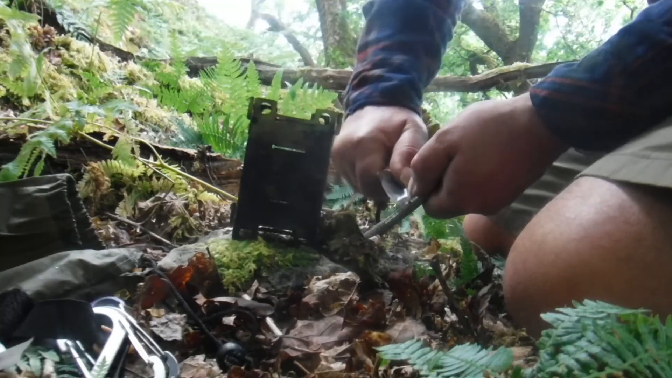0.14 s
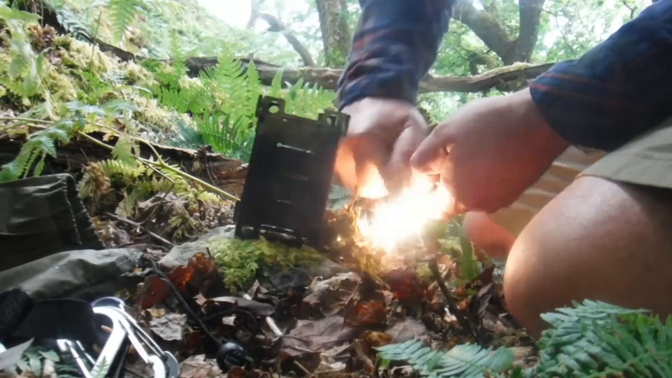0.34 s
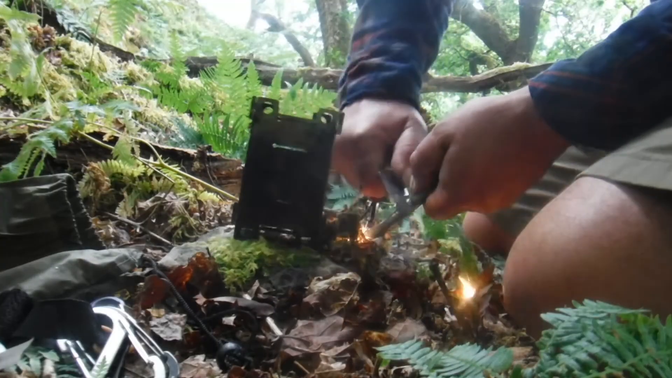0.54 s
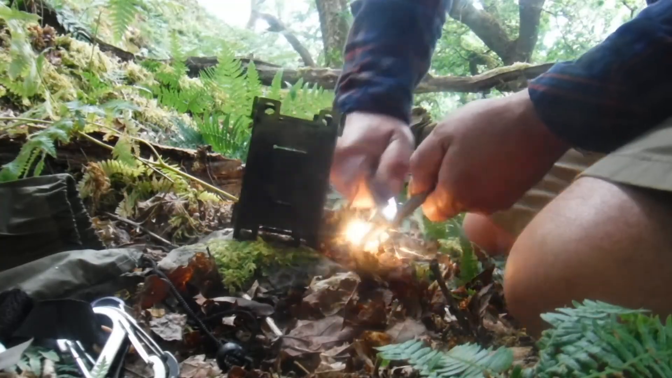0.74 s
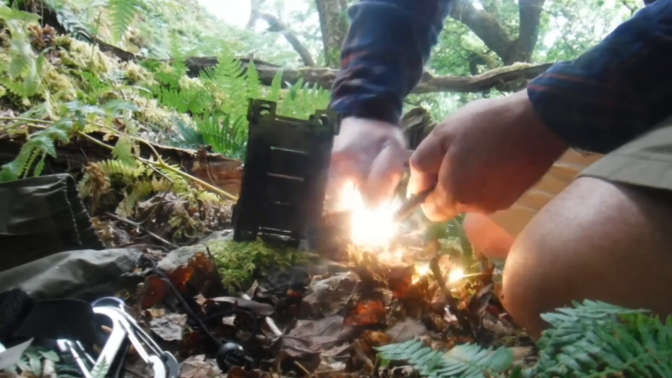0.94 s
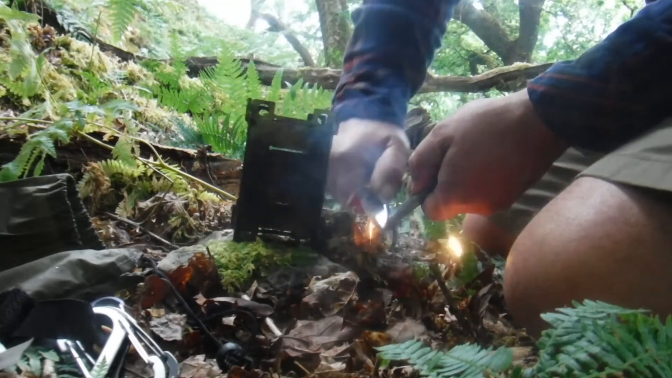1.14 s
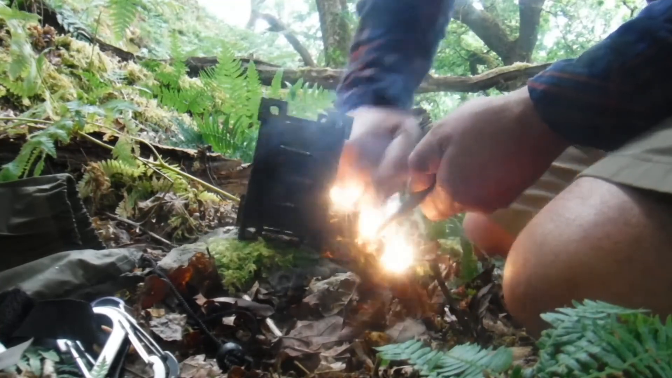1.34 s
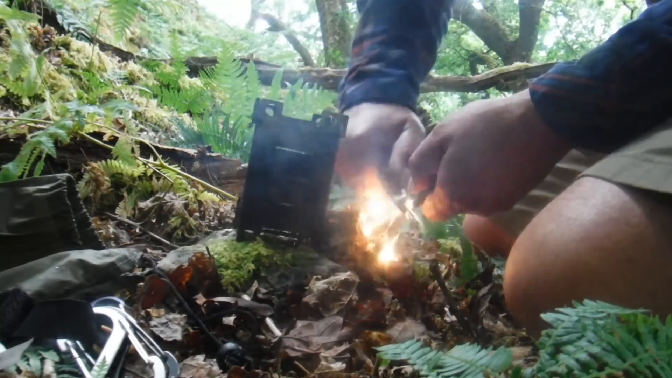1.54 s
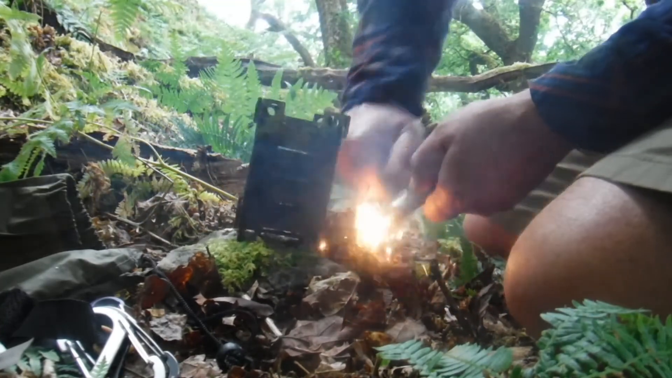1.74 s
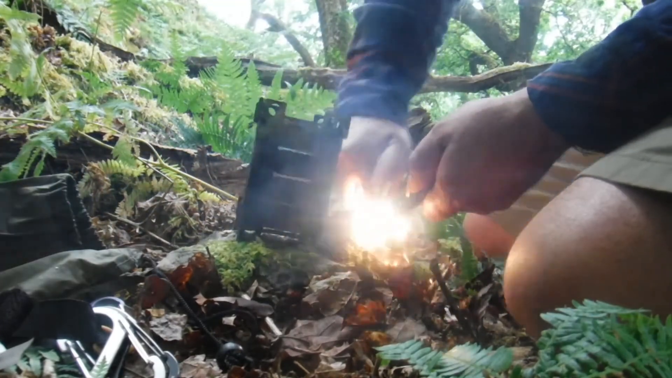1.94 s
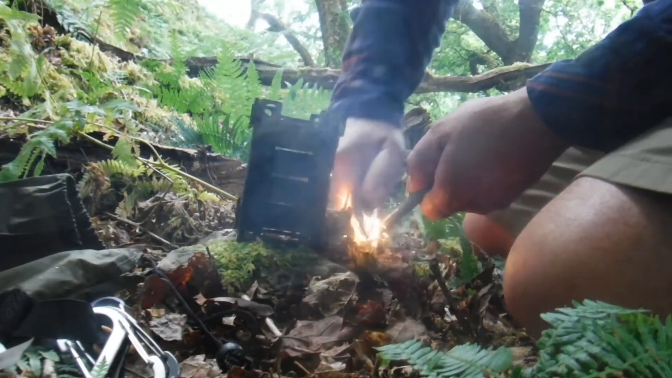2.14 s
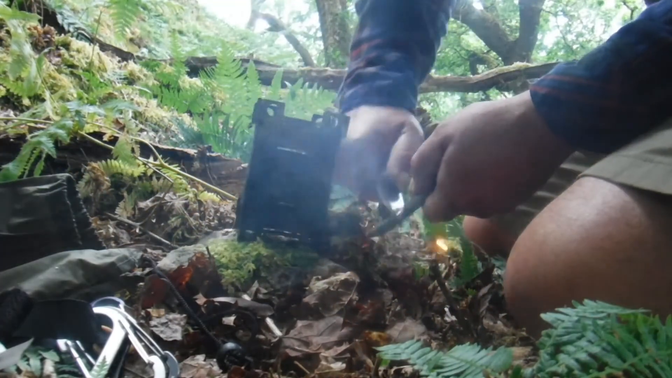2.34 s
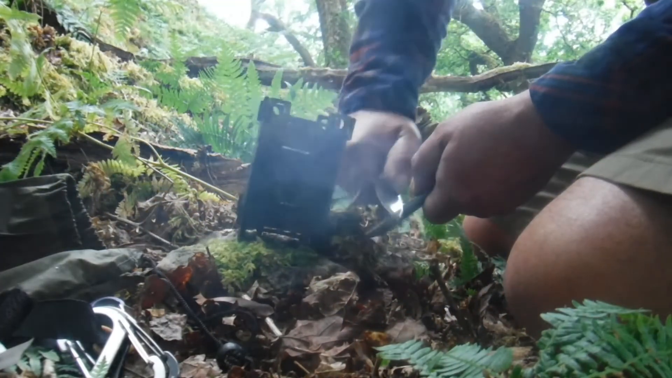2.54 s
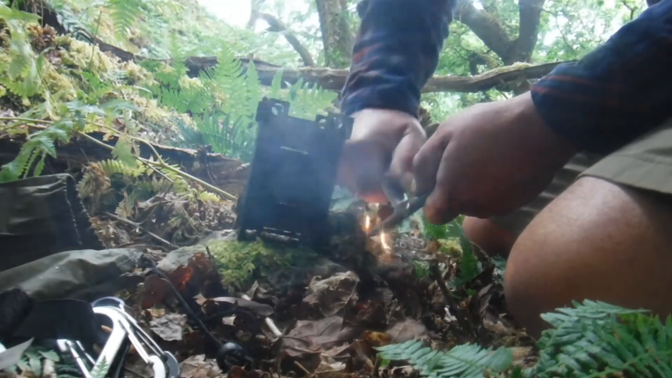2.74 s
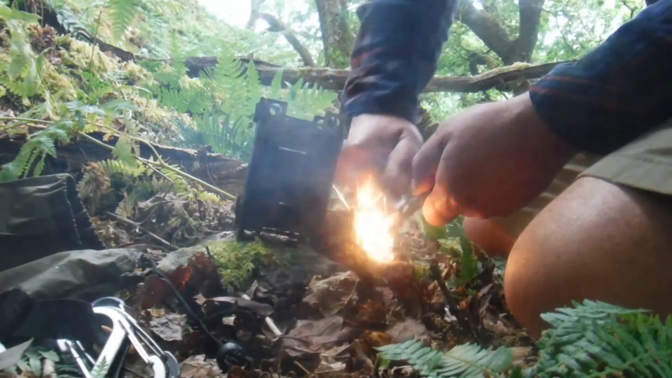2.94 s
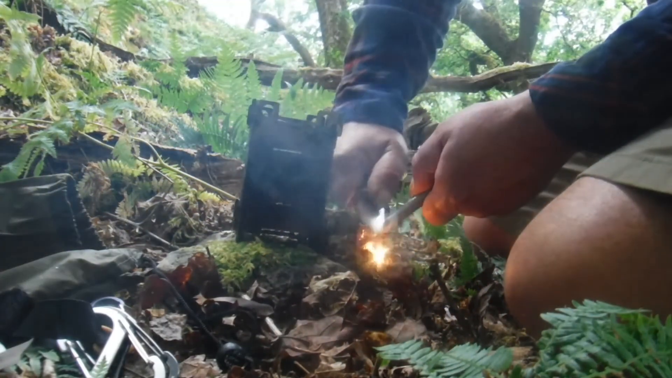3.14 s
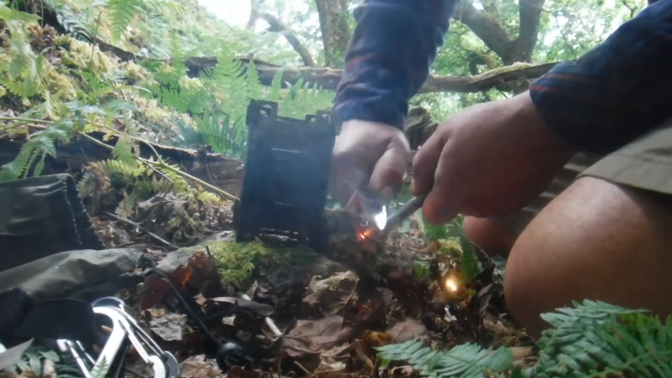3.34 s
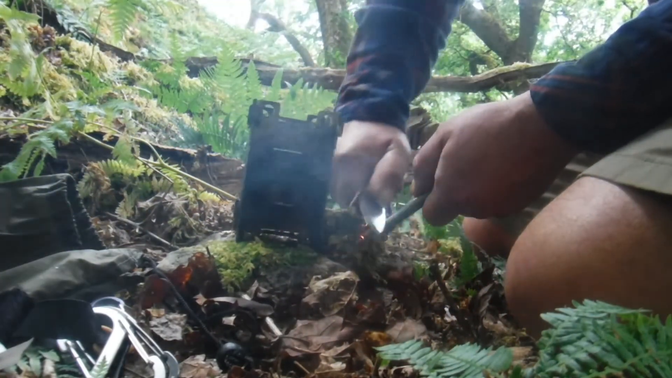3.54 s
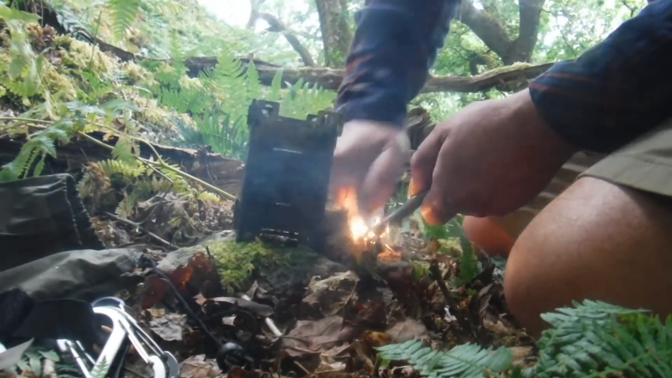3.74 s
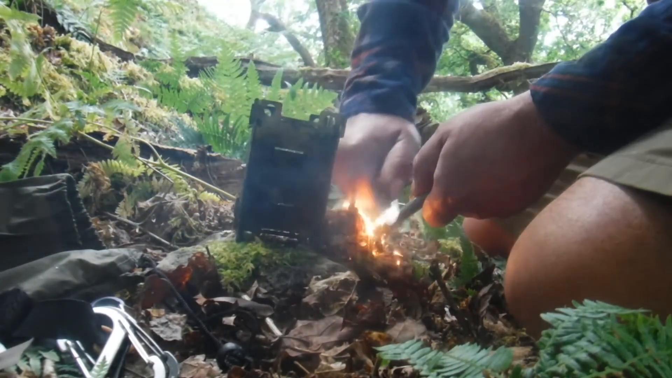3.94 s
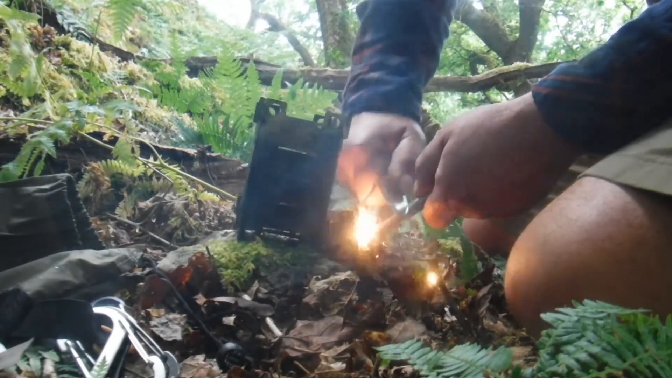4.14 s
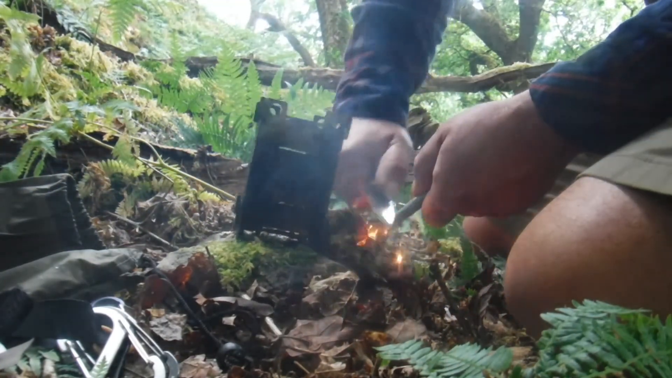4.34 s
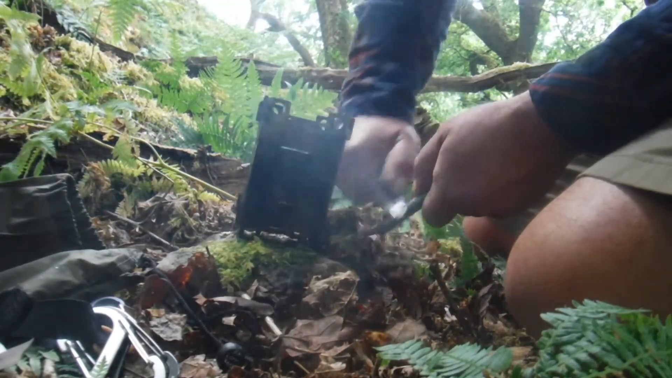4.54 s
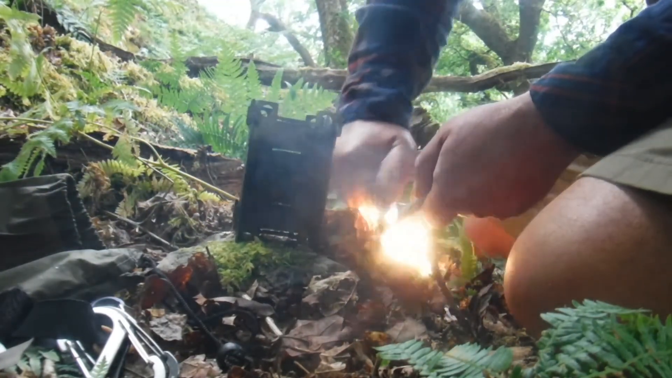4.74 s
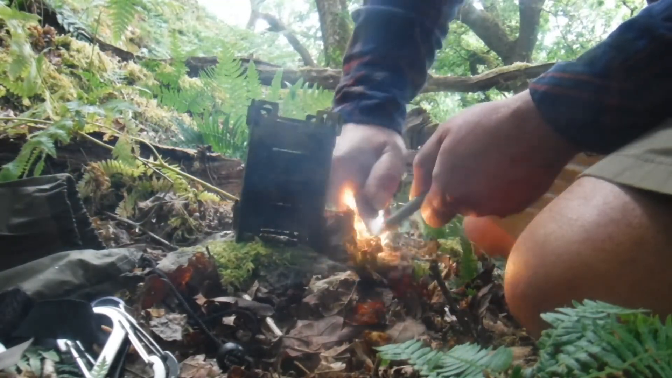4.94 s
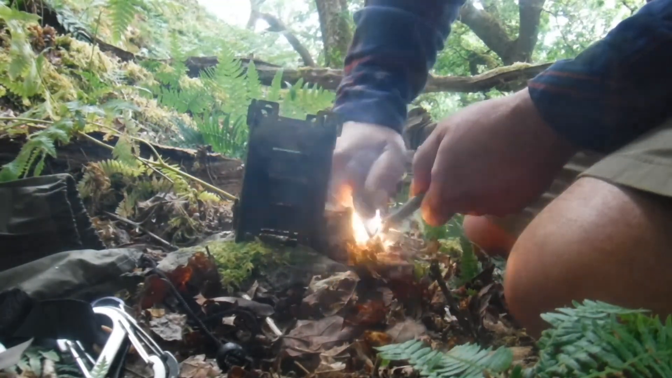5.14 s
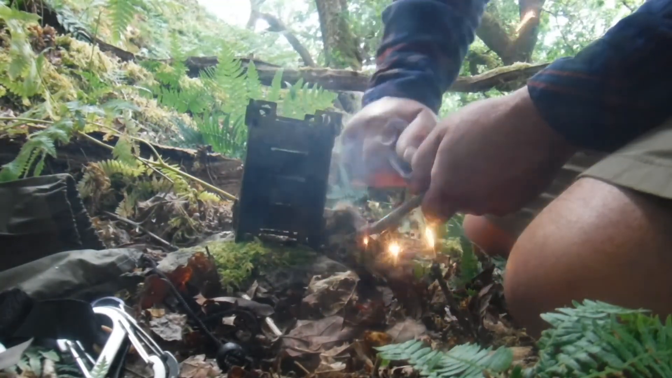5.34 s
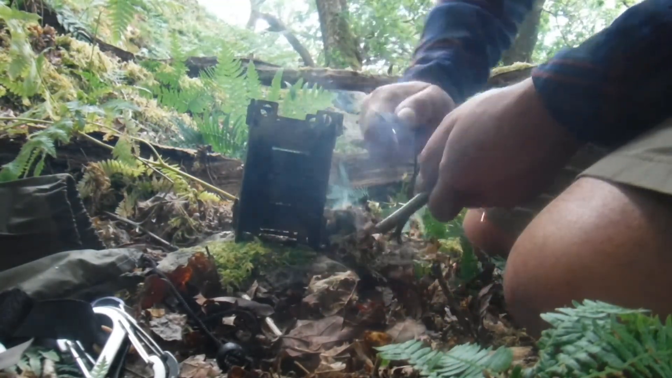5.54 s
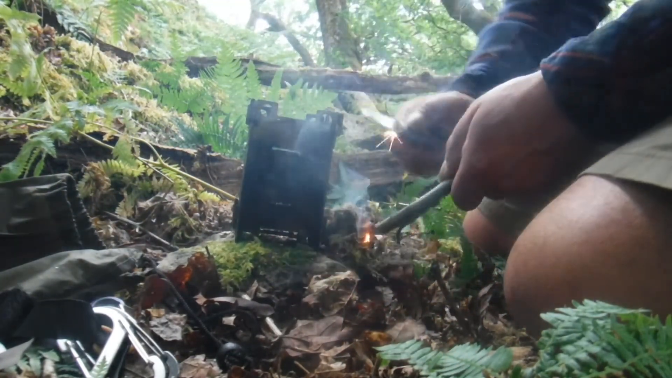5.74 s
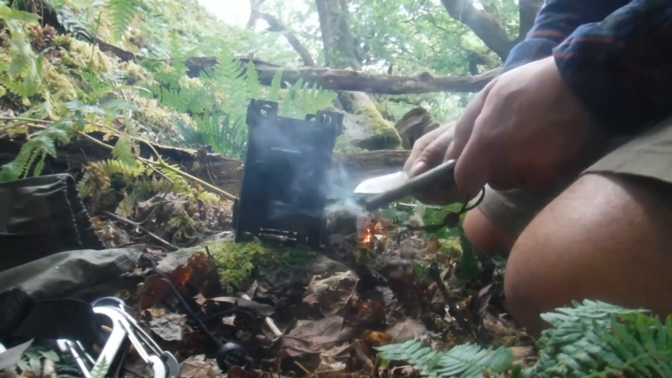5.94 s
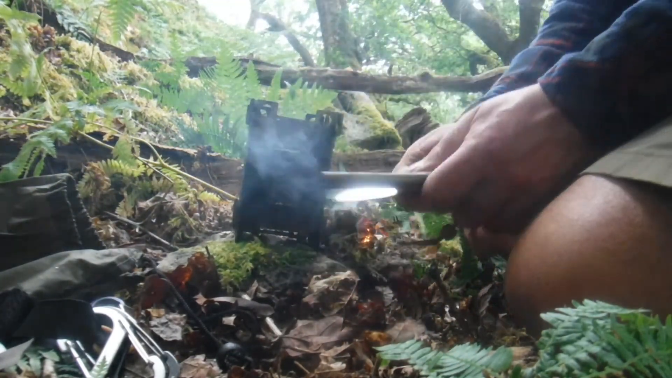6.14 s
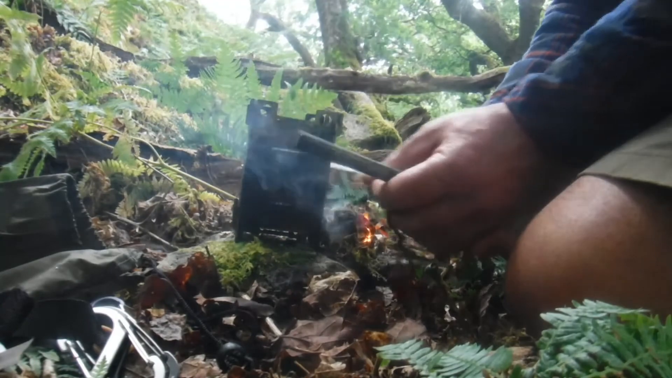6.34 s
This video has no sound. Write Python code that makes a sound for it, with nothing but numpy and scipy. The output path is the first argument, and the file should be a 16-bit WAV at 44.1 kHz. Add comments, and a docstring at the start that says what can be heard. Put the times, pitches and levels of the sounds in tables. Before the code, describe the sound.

A steel striker scrapes rapidly back and forth along a fire steel rod, raspy and squeaking with snapping sparks, then small tool clicks in quiet woodland.

```python
"""In a quiet wood, a steel striker is rubbed fast up and down a fire steel rod.
The torn grit comes in bursts of bright rasp, made of filtered noise and random clicks, that ring the rod.
The edge often catches and squeaks (short gliding tones), and burning sparks snap (clicks with a spatter).
The striker plate rings thinly and the rod's foot bumps the ground. After the last rasp, small clicks and
dull knocks tell of tools being handled, over a faint grainy hiss and a soft woodland hush of noise."""
import sys
import numpy as np
from scipy import signal
from scipy.fft import rfft, irfft
from scipy.io import wavfile

SR = 44100
rng = np.random.default_rng(int(sys.argv[2]) if len(sys.argv) > 2 else 0)


def file_out(sig):
    """Save sig as 16-bit WAV at sys.argv[1]."""
    # one column per channel
    cols = np.atleast_2d(sig).T
    # limit, then scale
    lim = np.clip(cols, -1, 1)
    pcm = np.round(lim * 32767).astype(np.int16)
    wavfile.write(sys.argv[1], SR, pcm)


N = 286209   # length of the scene in samples

# bursts of rasp; one rub may hold several:
# (start [s], length [s], rasp level [dB], tilt from middle to end [dB])
RASP_BURSTS = [(0.0, 0.039, -39, 2), (0.106, 0.097, -50, -13.5), (.201, 0.089, -39, -0.2),
               (0.318, 0.063, -39.5, 1), (0.414, 0.048, -32.5, 3), (0.519, 0.092, -43, -6.5),
               (0.569, 0.02, -36, -2), (0.605, 0.12, -38, -2.5), (0.683, 0.039, -33.5, -3),
               (0.741, 0.021, -34.5, -2.5), (0.769, 0.13, -42, 2.5), (0.92, 0.064, -37.5, 2.5),
               (0.973, 0.098, -46.5, 4.5), (1.087, 0.051, -42, 2.5), (1.16, 0.026, -29.5, -5),
               (1.204, 0.015, -42.5, 5), (1.253, 0.11, -36.5, -2.6), (1.358, 0.048, -47.5, -7),
               (1.392, 0.087, -38.5, 5), (1.5, 0.06, -42, -2), (1.567, 0.086, -39, 6.5),
               (1.671, 0.056, -40, 7), (1.758, 0.062, -38, 3.5), (1.837, 0.059, -37, -1),
               (1.93, 0.12, -42, -3.5), (2.084, 0.066, -38, 1.1), (2.169, 0.055, -42.5, -5.5),
               (2.249, 0.026, -41, 1.5), (2.32, 0.039, -42, 9), (2.414, 0.052, -39.5, -0.2),
               (2.515, 0.016, -47, 0.5), (2.59, 0.052, -40.5, -2), (2.684, 0.064, -44, 2),
               (2.769, 0.0034, -43, -3.5), (2.795, .13, -39, -0.7), (2.928, 0.063, -38.5, 1.5),
               (3.015, 0.016, -40.5, 1), (3.049, 0.14, -49.5, 3), (3.131, 0.08, -49.5, -6.5),
               (3.205, 0.072, -49.5, 0), (3.315, 0.074, -42, 0), (3.4, 0.028, -46.5, 4),
               (3.485, 0.069, -42.5, 0.5), (3.612, 0.16, -38.5, 4.5), (3.763, 0.052, -39.5, -5),
               (3.84, .11, -37.5, 2), (3.986, 0.09, -36.5, -2), (4.072, 0.085, -46, 8.5),
               (4.166, 0.084, -41, 1), (4.251, 0.021, -39, -3.5), (4.288, 0.032, -36, 6),
               (4.362, 0.09, -41, -4.5), (4.445, 0.028, -52, 13), (4.556, 0.065, -42, 1),
               (4.616, 0.083, -39, 8), (4.73, 0.06, -42, 0), (4.836, 0.0079, -40, 0),
               (4.913, 0.13, -40.5, 0), (5.048, 0.13, -42.5, -1.7), (5.131, 0.029, -46, -4),
               (5.167, 0.056, -42.5, 5.5), (5.239, 0.048, -41.5, -5), (5.322, 0.017, -54, -9)]


def from_db(db):
    """Turn decibels into a gain."""
    return 10 ** (np.asarray(db) / 20)


def rms_one(x):
    """Scale a signal so that its rms is 1."""
    return x / np.sqrt(np.mean(x ** 2) + 1e-20)


def at_hz(points, hz):
    """Read a (frequency, level) table on a logarithmic frequency axis."""
    table_hz, table_db = np.transpose(points)
    return np.interp(np.log(hz), np.log(table_hz), table_db)


def drift(rate_hz):
    """Random wandering of rms 1: noise smoothed so that little is left above rate_hz."""
    r = np.exp(-2 * np.pi * rate_hz / SR)
    noise = rng.standard_normal(N + 4000)
    # the first 4000 samples let the filter settle
    return rms_one(signal.lfilter([1], [1, -2 * r, r * r], noise)[4000:])


def grains(per_s, spread_db):
    """Random clicks of uneven size and sign, with rms 1."""
    sizes = from_db(spread_db * np.minimum(rng.exponential(1, N), 5))
    signs = rng.choice([-1, 1], N)
    present = rng.random(N) < per_s / SR
    return rms_one(sizes * signs * present)


def woodland():
    """Distant air in the leaves and a hiss: shaped noise, gently wavering in level."""
    # balance of the hush: (frequency [Hz], relative level [dB per Hz])
    hush_shape = [(15, -24), (25, 5), (86, 3.5), (129, 1.5), (199, 1.5), (275, -1.5), (485, -4),
                  (951, -8.5), (1500, -7.5), (2200, -13.5), (15700, -23)]
    hz = np.maximum(np.fft.rfftfreq(N, 1 / SR), 5)
    spectrum = rfft(rng.standard_normal(N)) * from_db(at_hz(hush_shape, hz))
    hush = irfft(spectrum, N)
    return from_db(-56 + 1.0 * drift(29.0)) * rms_one(hush)


def grainy_hiss():
    """A faint, bright, grainy hiss under everything: many tiny clicks whose level changes over time."""
    # strength of the grainy hiss: (time [s], level [dB])
    hiss_levels = [(0, -55), (2.0, -57), (2.6, -64), (3.5, -59), (4.2, -56), (5.2, -56), (5.45, -59.5),
                   (5.9, -68.5), (6.49, -63.5)]
    s, points_db = np.transpose(hiss_levels)
    level_db = np.interp(np.arange(N) / SR, s, points_db)
    return from_db(level_db) * grains(5400, spread_db=3.0)


def rasp_pressure(rise_db_per_s=1100, fall_db_per_s=700):
    """Pressing harder tears off more grit: rasp gain over time, and the thud's level against it in dB."""
    t, gain = np.arange(N) / SR, np.zeros(N)
    for start, length, rasp_db, tilt_db in RASP_BURSTS:
        near = slice(max(0, int((start - .06) * SR)), int((start + length + .09) * SR))
        u = 2 * (t[near] - start) / length - 1   # -1 at the start of the burst, 1 at its end
        inside = np.clip(u, -1, 1)
        outside_s = (u - inside) * length / 2
        # pressure arches over the burst and lets go quickly at both ends
        bite = np.clip(-tilt_db / 10.0, 0, 1)   # a burst that fades began with a hard bite
        arch_depth = 3.9 * np.where(inside < 0, 1 - bite, 1)
        arch_db = 1.0 + tilt_db * inside - arch_depth * inside ** 4
        rise_db = rise_db_per_s * (1 + 6.8 * bite) * outside_s   # a hard bite starts faster
        ends_db = np.where(outside_s < 0, rise_db, -fall_db_per_s * outside_s)
        gain[near] = np.hypot(gain[near], from_db(rasp_db + arch_db + ends_db))
    start, length, rasp_db, _ = np.transpose(RASP_BURSTS)
    # the dull thud under the rasp swings less than the rasp itself, around a usual rasp of -41 dB
    thud_db = -0.63 * (np.interp(t, start + length / 2, rasp_db) - -41)
    return gain, thud_db


def torn_grit():
    """Fine dust makes a smooth rasp and rarer chips tick; each band varies in strength by itself."""
    # treble and lows against the plain rasp: (time [s], sizzle level [dB], thud level [dB])
    balance = [(0, -3, 6.5), (.24, -3, -0.5), (.35, 3, 10), (.44, -12, -1.5), (.6, 3, 7.5), (.95, 0, 6.5),
               (1.15, -1, 1), (1.3, 3, 4.5), (1.65, 1, 7.5), (2.05, -1.5, 5), (2.2, -20, 1.5),
               (2.55, -11, -1), (2.72, -3, 5.5), (2.9, 6.5, 8.5), (3.16, 6.5, 1), (3.24, -23, -3),
               (3.35, 1.5, 1.5), (3.85, 1.5, 7), (4.05, 2, 2.3), (4.75, -2.5, 3), (5.0, 7.5, 9),
               (5.12, 9, 9.5), (5.2, -11, -1), (5.27, 3, -1)]
    gain, thud_db = rasp_pressure()
    s, sizzle_points, lows_points = np.transpose(balance)
    t = np.arange(N) / SR
    sizzle_db = np.interp(t, s, sizzle_points)
    lows_db = np.interp(t, s, lows_points)
    clumps = from_db(2.34 * drift(79))   # the edge bites and slips
    dust = clumps * rng.standard_normal(N)
    chips = grains(1600, spread_db=3.5)
    grit = rms_one(dust + .7 * chips)
    torn = np.zeros(N)
    edges = 80 * 2 ** np.arange(0, 8.1, 1 / 3)   # third-octave bands from 80 Hz
    for k, (low, high) in enumerate(zip(edges, edges[1:])):
        hz = np.sqrt(low * high)
        # how much the thud and the sizzle count in this band
        thud = 1 / (1 + (hz / 3000) ** 3)
        sizzle = 1 / (1 + (8200 / hz) ** 8)
        patchy = from_db(2.8 * drift(18))
        strength = gain * patchy * from_db(thud * (thud_db + lows_db) + sizzle * sizzle_db)
        band = signal.butter(2, [low, high], "band", fs=SR, output="sos")
        torn += (-1) ** k * signal.sosfilt(band, strength * grit)   # alternate signs join the bands smoothly
    return torn


def rod_whistle(torn, mode_hz=2230, width_hz=150):
    """The grit rings the rod's bending mode, a faint whistle that wavers as the edge nearly catches."""
    r, w = np.exp(-np.pi * width_hz / SR), 2 * np.pi * mode_hz / SR
    push = from_db(3 * drift(8) - 1) * torn
    return signal.lfilter([1 - r, 0, r - 1], [1, -2 * r * np.cos(w), r * r], push)


def rod_modes(torn, climb=0.11, stray=0.05):
    """The free length of rod shortens under the edge, so its resonances climb along every burst."""
    # resonances rung by the grit: (frequency at mid-burst [Hz], width [Hz], level [dB])
    resonances = [(3390, 240, -3), (5614, 674, -2), (7320, 230, -2.5)]
    t, along = np.arange(N) / SR, np.zeros(N)
    for start, length, *_ in RASP_BURSTS:
        along[t >= start] = np.clip((t[t >= start] - start) / length, 0, 1) - .5
    out = np.zeros(N)
    for hz, width_hz, level_db in resonances:
        moving_hz = hz * (1 + climb * along + stray * drift(9.6))
        turn = np.exp(2j * np.pi * np.cumsum(moving_hz) / SR)
        # shift the resonance down to 0 Hz, keep what lies close to it, then shift it back
        low_pass = signal.butter(2, width_hz / 2, fs=SR, output="sos")
        narrow = signal.sosfilt(low_pass, torn / turn)
        out += 2 * from_db(level_db) * (narrow * turn).real
    return out


def snaps():
    """Sparks bursting, later tools being handled: each is a sharp click followed by a short spatter."""
    # sharp clicks: sparks bursting, then small clicks of tools being handled: (time [s], level [dB])
    clicks = [(0.0519, -20.5), (0.109, -18), (0.2726, -18.5), (0.5224, -14.5), (0.561, -24), (0.574, -15),
              (.6849, -15), (.743, -14), (1.023, -28), (1.1612, -30), (1.266, -18), (1.7662, -22),
              (1.8137, -13), (2.1536, -12), (2.7387, -18), (2.826, -20), (2.9308, -27), (2.9876, -7.5),
              (2.9994, -17), (3.105, -16), (3.3201, -22), (3.3774, -19), (3.3822, -6.5), (3.6952, -14.5),
              (3.7824, -11), (3.813, -15), (3.8198, -10), (3.994, -30), (4.146, -13), (4.209, -16.5),
              (4.3125, -11.5), (4.3189, -13), (4.348, -15.5), (4.6333, -8.5), (4.8056, -18.5), (4.814, -15),
              (4.932, -17), (4.995, -31), (5.013, -16), (5.057, -22), (5.1437, -15), (5.3308, -29.5),
              (5.36, -38), (5.372, -42), (5.5152, -24.5), (5.519, -45), (5.53, -36), (5.7666, -28.5),
              (5.776, -42), (5.834, -39), (5.876, -21.5), (5.8806, -13.5), (5.888, -29), (5.909, -36),
              (6.17, -41), (6.208, -37), (6.2868, -26.5), (6.395, -38)]
    out, k = np.zeros(N), np.arange(1500)
    shape = (len(clicks), len(k))
    spatter = rng.standard_normal(shape) * (rng.random(shape) < .12)
    for (s, level_db), bits in zip(clicks, spatter):
        dying_ms = max(0.67 - 0.3 * level_db, .3)   # fainter clicks spatter longer
        click = from_db(-12) * bits * np.exp(-k / (dying_ms * SR / 1000))
        click[0] = 1
        at = round(s * SR)
        out[at:at + len(k)] += from_db(level_db) * click[:N - at]
    return out


def steel_colour():
    """The steel's tone as a short echo of one click: its energy comes as early as it can; unit power."""
    # colour of torn grit through the steel: (frequency [Hz], relative level [dB per Hz])
    grit_shape = [(120, -14.5), (400, -17), (1300, -14.5), (2300, -10.5), (3600, -5), (4600, 0.5),
                  (5600, 0.5), (6600, -1.5), (7200, -6), (9000, -14.5), (11000, -27), (15500, -50)]
    hz = np.maximum(np.fft.rfftfreq(4096, 1 / SR), 20)
    # folding the cepstrum (spectrum of the log spectrum) onto its first half gives minimum phase
    cepstrum = irfft(np.log(from_db(at_hz(grit_shape, hz))))
    cepstrum[1:2048] *= 2
    cepstrum[2049:] = 0
    response = irfft(np.exp(rfft(cepstrum)))[:1024]
    return response / np.sqrt(np.sum(response ** 2))


def rasp():
    """Grit, grainy hiss and snaps all take on the same steel colour."""
    torn = torn_grit()
    torn += rod_whistle(torn)
    torn += rod_modes(torn)
    colour = steel_colour()
    pops = snaps() / np.abs(colour).max()
    # a snap is sharper than the grit: more of the very top
    very_top = signal.butter(2, 11000, "high", fs=SR, output="sos")
    pops = pops + from_db(1) * signal.sosfilt(very_top, pops)
    return signal.fftconvolve(torn + grainy_hiss() + pops, colour)[:N]


def squeaks(third_db=-21, fourth_db=-31, grind_db=-13):
    """The edge sticks and slips: a short gliding tone with overtones, unsteady in pitch and level."""
    # catches of the edge: (middle [s], half length [ms], slip rate [Hz],
    # glide across the two half lengths [Hz], level [dB], octave over it [dB])
    catches = [(.113, 5.3, 2230, -62, -38, -16), (.549, 9.7, 2144, 205, -35, -23),
               (.872, 7.8, 2204, -113, -19.5, -5.5), (.94, 6, 2210, -47, -36.5, -12),
               (1.053, 6, 2197, -84, -22, -3), (1.198, 6, 2280, -96, -37.5, -4),
               (1.37, 4.8, 2200, -150, -23.5, -5), (1.544, 11, 2280, -110, -39, -15),
               (1.701, 7, 2240, 32, -33, -11), (1.722, 2.6, 2190, 85, -19, -9),
               (1.884, 6.4, 2373, -100, -23, -1), (2.036, 3.2, 2370, -64, -36, -10),
               (2.204, 9.4, 2293, -44, -31, -8), (2.346, 8, 2214, 8, -27.5, -10),
               (2.526, 6, 2180, -29.5, -19.5, -1), (2.715, 8, 2170, 2, -45, -14),
               (2.732, 5.1, 2154, 88, -19.5, -4.5), (2.901, 5.5, 2075, -110, -31, -2),
               (3.232, 13, 2220, -5, -38.5, -14), (3.252, 2.1, 2230, -107, -22, -2.5),
               (3.425, 3.6, 2150, -230, -24, 0.5), (3.619, 8.3, 2236, 32, -19.5, 0),
               (3.772, 1.4, 2090, 106, -25, 2), (3.789, 7, 2080, -56, -33, 8),
               (3.975, 10.5, 2270, 130, -26.5, -1.5), (4.135, 4.9, 2383, -290, -27, -0.5),
               (4.491, 5.5, 2170, -105, -24.5, 4), (4.672, 6.8, 2267, -23.5, -23.5, 4.5),
               (4.842, 5.3, 2170, -105, -23, 0.5), (4.859, 5.2, 2130, -170, -32.5, -7),
               (5.023, 1.7, 2190, -51, -28, -3), (5.208, 4.2, 1880, -50, -40, -12)]
    out, t = np.zeros(N), np.arange(-1500, 2200) / SR * 1000   # ms around the middle
    wobble, flutter, rough = drift(111), drift(156), drift(420)
    # every slip also grinds: noise around and below the octave
    grind_band = signal.butter(4, [3300, 5100], "band", fs=SR, output="sos")
    grind = rms_one(signal.sosfilt(grind_band, rng.standard_normal(N)))
    for s, half_ms, slip_hz, glide_hz, level_db, octave_db in catches:
        near = slice(round(s * SR) - 1500, round(s * SR) + 2200)
        away = np.abs(t) / (half_ms * np.where(t < 0, 0.95, 1))   # rises slightly faster than it falls
        height = from_db(1.5 - 6.8 * away ** 1.64 + 1.66 * flutter[near])
        glide = np.clip(t / half_ms, -1.5, 1.5)
        hz = (slip_hz + glide_hz * glide / 2) * (1 + 0.013 * wobble[near])
        phase = 2 * np.pi * np.cumsum(hz) / SR
        overtones = np.zeros(len(t))
        for k, db in ((2, octave_db), (3, third_db), (4, fourth_db)):
            overtones += from_db(db) * np.sin(k * phase - k) * (1 + 0.33 * rough[near])
        overtones += from_db(octave_db + grind_db) * grind[near]
        # harder slips are sharper: overtones grow faster than the fundamental
        out[near] += from_db(level_db) * height * (np.sin(phase) + height ** 0.3 * overtones)
        # the edge catches only now and then before and after: a faint ragged skirt on the same pitch
        skirt = from_db(level_db - 16 - 3.5 * away) * wobble[near]
        out[near] += skirt * (np.cos(phase) + from_db(octave_db) * np.cos(2 * phase))
    return out


def striker_ring(ring_hz=10350, t60_s=0.085):
    """Knocks set one thin mode of the striker plate ringing; it falls by 60 dB in t60_s."""
    # knocks on the striker plate: (time [s], level [dB])
    plate_hits = [(.1062, -49), (.2783, -50), (.7058, -47), (.7437, -40), (.8435, -52), (1.1593, -41),
                  (1.2595, -52), (2.3276, -53), (2.6998, -47), (2.801, -53), (2.9771, -52), (4.0043, -47),
                  (4.5615, -52)]
    s, level_db = np.transpose(plate_hits)
    push = np.full(N, 1e-18)   # inaudible floor, never exactly zero
    push[np.round(s * SR).astype(int)] = from_db(level_db)
    r, w = from_db(-60 / (t60_s * SR)), 2 * np.pi * ring_hz / SR
    return signal.lfilter([0, np.sin(w)], [1, -2 * r * np.cos(w), r * r], push)


def thumps():
    """The rod's foot bumps the ground: a soft puff of low, dull noise that dies fast."""
    # bumps of the rod's foot: (time [s], level [dB])
    bumps = [(0.678, -41), (0.955, -41), (1.804, -40.5), (3.046, -37.5), (3.703, -38), (3.899, -38),
             (5.197, -47)]
    out, t = np.zeros(N), np.arange(4000) / SR
    dull = signal.butter(2, [90, 330], "band", fs=SR, output="sos")
    puffs = signal.sosfilt(dull, rng.standard_normal((len(bumps), len(t))))
    swell = t / 0.026 * np.exp(1 - t / 0.01)   # strongest after 10 ms
    for (s, level_db), puff in zip(bumps, puffs):
        at = round(s * SR)
        out[at:at + len(t)] += from_db(level_db) * rms_one(puff) * swell
    return out


def knocks(cycles=11.5):
    """Tools touch in the hands: dull tones damped by the fingers, down 60 dB after a few cycles."""
    # touches of the tools: (time [s], level [dB], pitch [Hz])
    touches = [(5.834, -45, 2100), (5.878, -42, 700), (5.88, -33.5, 1290), (6.2861, -29.5, 2190),
               (6.293, -40, 1450)]
    out, t = np.zeros(N), np.arange(1500) / SR
    for s, level_db, hz in touches:
        at = round(s * SR)
        fading = from_db(level_db - 60 * t * hz / cycles)
        out[at:at + len(t)] += fading * np.sin(2 * np.pi * hz * t)
    return out


def scene():
    """Close, dry sources over the hush, in one channel."""
    tools = rasp() + squeaks() + striker_ring() + thumps() + knocks()
    return (woodland() + tools)[None]


def record(dry, cutoff_hz=15800):
    """Cut the top steeply."""
    steep = signal.ellip(12, .5, 60, cutoff_hz, fs=SR, output="sos")
    return signal.sosfilt(steep, dry)


dry = scene()
out = record(dry)
file_out(out)
```